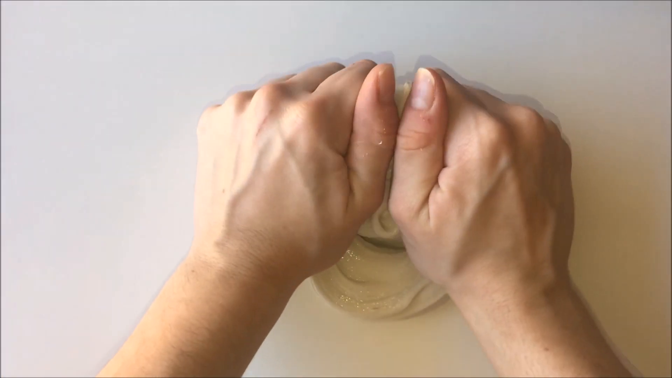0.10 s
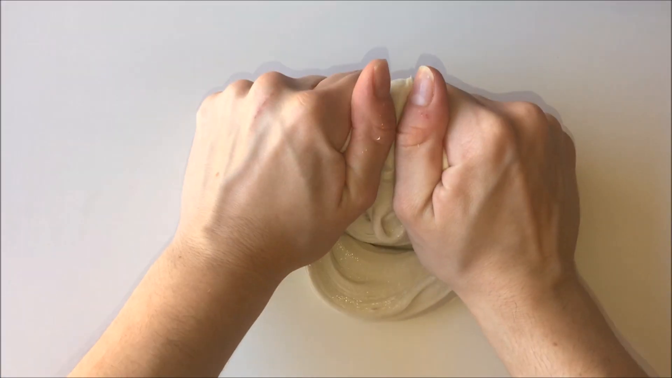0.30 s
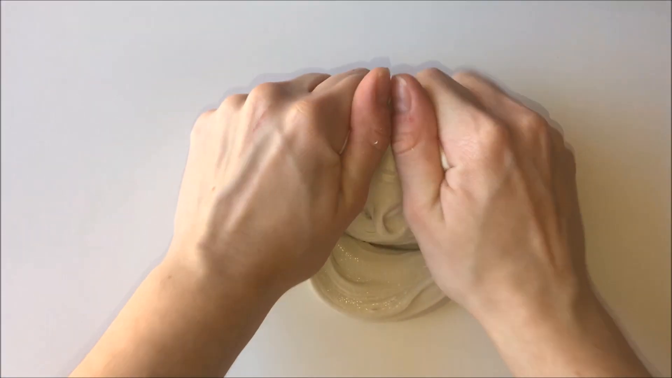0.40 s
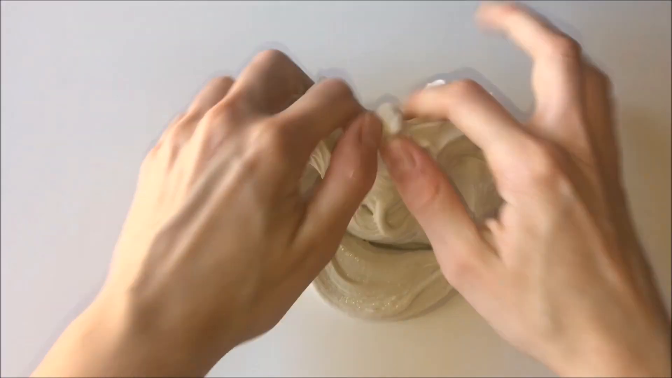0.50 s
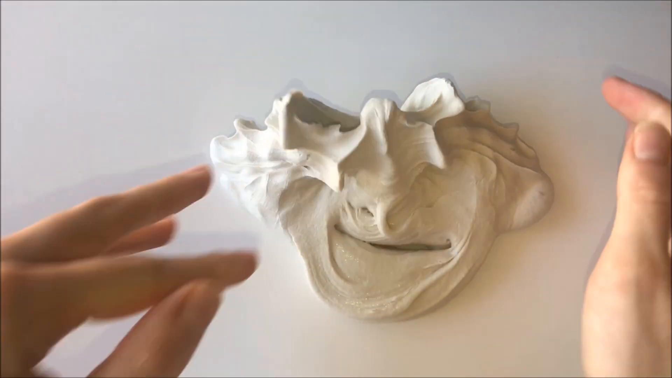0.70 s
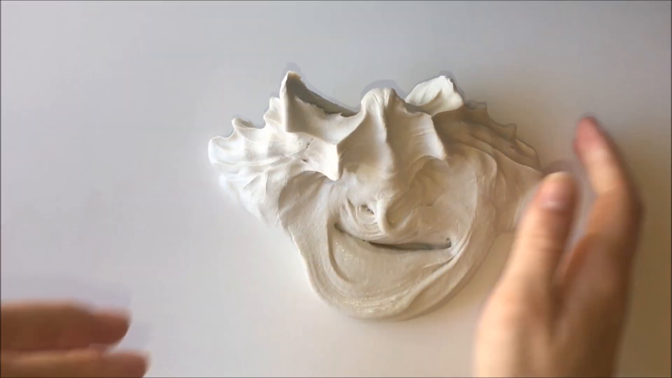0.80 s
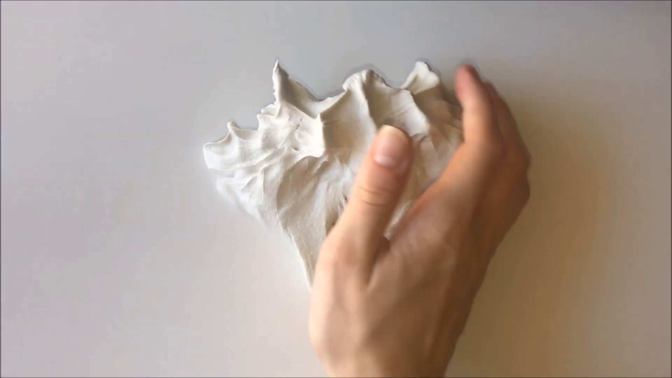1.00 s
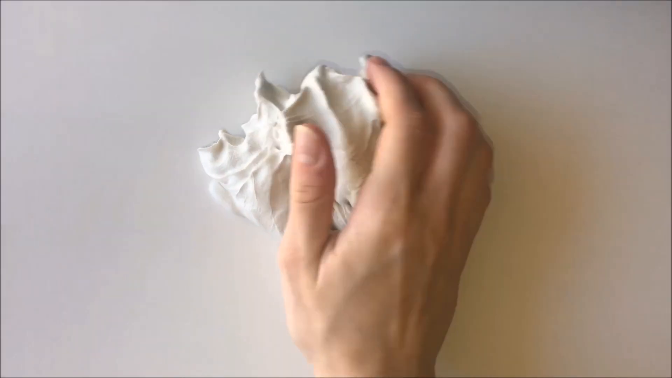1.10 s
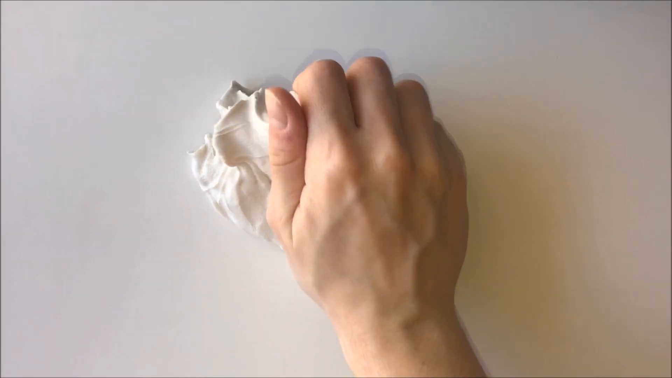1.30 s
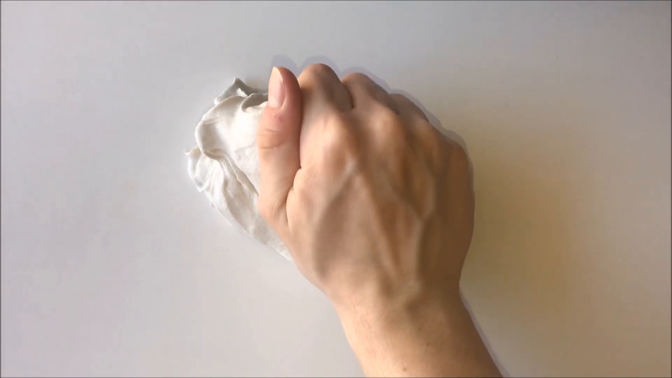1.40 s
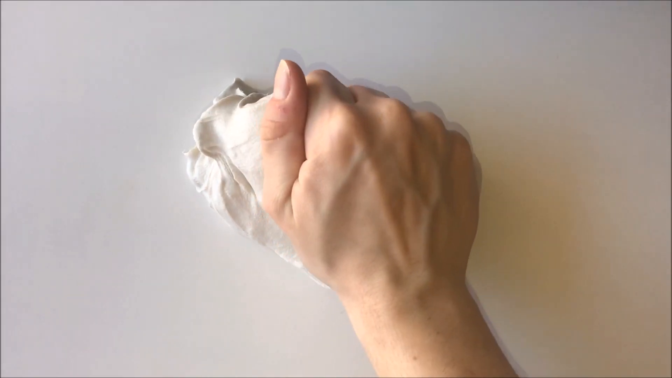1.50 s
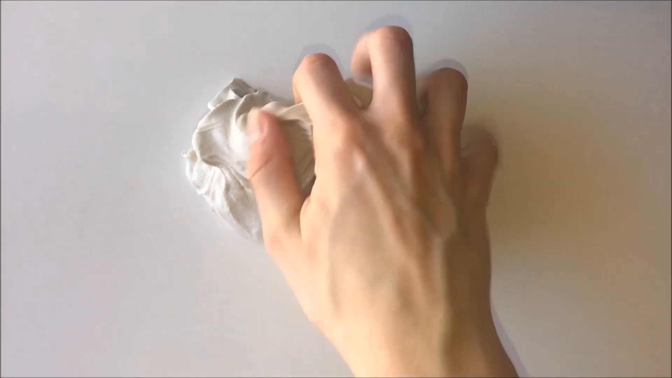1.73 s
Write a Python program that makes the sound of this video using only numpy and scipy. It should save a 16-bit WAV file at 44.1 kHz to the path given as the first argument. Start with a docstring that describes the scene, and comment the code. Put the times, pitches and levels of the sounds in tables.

```python
"""Close microphone over a table in a small room: hands let go of a lump of sticky slime, and films tear
and air pockets burst in a flurry of sharp pops, struck resonances that echo off the table and ring in the room.
Squelches (noise in narrow resonances) and peeling skin (a dense crackle of tiny ringing snaps) run among them.
After a near-silent gap one hand squeezes the lump: more squelches, sparser pops, fresh crackle.
Underneath all along lies the quiet room: coloured noise and low hums."""
import sys
import numpy as np
from scipy import signal
from scipy.fft import rfft, irfft
from scipy.io import wavfile

SR = 44100
rng = np.random.default_rng(int(sys.argv[2]) if len(sys.argv) > 2 else 0)


def int16_out(signal):
    """Quantize to a 16-bit WAV file."""
    q = np.round(np.clip(np.atleast_2d(signal).T, -1, 1) * 32767)
    wavfile.write(sys.argv[1], SR, q.astype(np.int16))


N = 79380  # samples, 1.8 s

# Colour of the peeling crackle before its tilt moves: pitch_hz, density_db (relative, per Hz)
CRACKLE_COLOUR = [(220, -10.5), (400, 1), (800, -15), (1500, -0.5), (2500, -4), (4000, -2), (7000, -6.5),
                  (15500, -10.5)]


def amp(db):
    """Turn decibels into gain."""
    return 10 ** (np.asarray(db) / 20)


def rms_one(x):
    """Scale to unit rms."""
    return x / np.sqrt(np.mean(x ** 2) + 1e-20)


def peak_one(x):
    """Scale to unit peak."""
    return x / np.abs(x).max()


def at_hz(points, hz):
    """Read a spectrum in dB on a log-frequency axis."""
    table_hz, table_db = np.array(points).T
    return np.interp(np.log(hz), np.log(table_hz), table_db)


def ring(clicks, hz, t60):
    """A two-pole resonator: each click starts a sine at hz that falls 60 dB in t60 seconds."""
    radius = amp(-60 / (t60 * SR))
    angle = 2 * np.pi * hz / SR
    feedback = [1, -2 * radius * np.cos(angle), radius * radius]
    return signal.lfilter([0, np.sin(angle)], feedback, clicks + 1e-18)


def butter(x, hz, kind):
    """Second-order Butterworth filter."""
    return signal.sosfilt(signal.butter(2, hz, kind, fs=SR, output="sos"), x)


def drift(corner_hz):
    """Slow random wander of unit rms: noise through two equal low-pass poles."""
    settle = 4000  # samples dropped while the filter settles
    pole = np.exp(-2 * np.pi * corner_hz / SR)
    noise = rng.standard_normal(N + settle)
    return rms_one(signal.lfilter([1], [1, -2 * pole, pole * pole], noise)[settle:])


def pops():
    """A snap and a short tearing burst excite the pocket's ring, a duller body mostly below its pitch
    and a broad fizz from somewhat below its pitch upwards."""
    # Pops: start_s, peak_db, pocket_hz, ring_cycles (in a 60 dB fall), body_db and fizz_db (against
    # the pocket's ring), tear_ms (time constant of the tearing's decay)
    bursts = [(0.0102, -38, 4870, 2.7, -24, -10, 2.6), (0.0141, -24.5, 2780, 6.3, -17.5, -22, 0.53),
              (0.0739, -35.5, 4540, 1.9, -13, -14, 1.6), (0.1144, -29, 2940, 5.2, -13, -37, 1.04),
              (0.116, -37, 7000, 2, 2.5, -25, 0.84), (0.136, -34.5, 3300, 15, -32, -4, 1.4),
              (0.14, -22, 6200, 1.6, -33, -10, 0.81), (0.142, -26.5, 8870, 2, -10, -26, 0.24),
              (0.1996, -21, 5740.0, 1, -17, -19, 3.4), (0.2052, -26.5, 3170, 12, -1, 7.5, 2.7),
              (0.2136, -11, 7100, 1.2, 5, 13, 1.3), (0.223, -34, 11000.0, 2.1, -52, -19, 2.2),
              (0.2346, -29.5, 8610.0, 3.2, 0, -13, 0.44), (0.2427, -23, 8000.0, 2.3, -14, 0, 0.95),
              (0.2546, -15.5, 6200.0, 1.3, -4.5, -25, 1.7), (0.2649, -1, 9500, 8.7, -31, -10.5, 0.34),
              (0.2698, -20, 3420, 15, -42, 1.5, 0.52), (0.287, 1.5, 8200, 3.7, -10.5, -14.5, 0.043),
              (0.296, -2, 4140, 2.6, -38, 0, 1.67), (0.2978, -8, 6060, 5.0, -10.5, -4, 2.0),
              (0.328, -30.5, 6220, 9.7, -27, -4, 13), (0.3554, -25, 1544, 12, -2, -12.5, 1.2),
              (0.509, -32, 3000, 5.2, 8.5, 8, 2.1), (0.544, -38, 3020, 8.3, -2.5, 1, 1.4),
              (0.5606, -28.5, 3300, 17, 0, -11, 3.2), (0.576, -30, 6760, 4.5, 1, -10, 4.5),
              (0.696, -40.5, 4250, 7.1, -32, -10, 6.6), (1.056, -10.5, 2690, 9.2, 2, -30, 0.48),
              (1.0578, -15, 1250, 5, -23.5, -36.5, 0.43), (1.0574, -29, 290, 4.6, -24, -25, 0.35),
              (1.1318, -26.5, 1300, 2.7, -4, -20, 5.3), (1.2934, -32.5, 2520, 2.8, -37, -22, 0.2),
              (1.3636, -24, 7600, 15, -10, -10.5, 0.37), (1.4158, -32.5, 3000, 2.9, -21, -21, 0.56),
              (1.458, -13.5, 4800, 3, -38, 19, 1.44), (1.4747, -22, 11100, 11, -6, -4, 1.2),
              (1.5124, -29, 4500, 2.2, -34, -30, 0.88), (1.5475, -0.5, 4460, 4.8, -34, 1.5, 0.25),
              (1.5475, -4.5, 5670, 7.3, -28, -25, 0.19), (1.548, -35.5, 550, 27, -17, -34.5, 0.27),
              (1.5972, -23.5, 10500, 5.5, -19, -15, 0.38), (1.6244, -36, 11000, 2.8, -15, -5, 0.3),
              (1.6626, -41, 3430, 3.7, 2.5, 12.5, 2), (1.788, -36, 785, 5.1, -2.5, 4, 5.5)]
    tearing_db = -6.5  # under the snap
    body_low_hz, fizz_from = 267.3, 0.58  # fizz edge as a share of the pocket's pitch
    length = 2048  # samples kept of each pop
    out, t = np.zeros(N + length), np.arange(length) / SR
    noises = rng.standard_normal((len(bursts), length))
    for (start_s, peak_db, hz, cycles, body_db, fizz_db, tear_ms), noise in zip(bursts, noises):
        spiky = noise * np.abs(noise) / 2
        push = amp(tearing_db) * spiky * np.exp(-t * 1000 / max(tear_ms, .05))
        push[0] = 1  # the snap
        pocket = ring(np.diff(push, prepend=0), hz, cycles / hz)
        body = butter(push, [body_low_hz, max(hz, 2 * body_low_hz)], "band")
        body = butter(body, body_low_hz, "high")
        fizz = butter(push, min(fizz_from * hz, .3 * SR), "high")
        pop = peak_one(pocket) + amp(body_db) * peak_one(body) + amp(fizz_db) * peak_one(fizz)
        i = int(start_s * SR)
        out[i:i + length] += amp(peak_db) * peak_one(pop)
    return out[:N]


def squelches():
    """Air squeezed through a wet gap: noise in a narrow resonance that swells and dies away."""
    # Squelches: peak_s, rise_ms, fall_ms (time constants), pitch_hz, width_hz (of each of two
    # resonators in a row), level_db (rms before the swell)
    squeezes = [(0.357, 1.2, 20.2, 1618, 156.8, -38), (0.361, 1.8, 12.6, 1335, 80, -40.5),
                (0.358, 3.5, 20, 337.6, 60, -58.5), (0.609, 30, 13, 1124, 440, -44.5),
                (1.045, 35, 5, 1900, 249.3, -60.5), (1.044, 26, 4.7, 2700, 500, -59.5),
                (1.134, 2.1, 23.5, 1430, 464, -43.5), (1.145, 8.9, 31, 359, 90, -54),
                (1.78, 8, 31, 1960, 119, -45)]
    t, out = np.arange(N) / SR, 0
    noises = rng.standard_normal((len(squeezes), N))
    for (peak_s, rise_ms, fall_ms, hz, width_hz, db), noise in zip(squeezes, noises):
        t60 = np.log(1000) / (np.pi * width_hz)
        ms = (t - peak_s) * 1000
        swell = np.exp(np.minimum(ms / rise_ms, -ms / fall_ms))
        tone = rms_one(ring(ring(noise, hz, t60), hz, t60))
        out = out + amp(db) * swell * tone
    return out


def peeling():
    """Skin peels and slime creeps: a dense fine crackle with larger wet bubbles, in clumps, following the hands."""
    # Course of the peeling: time_s, level_db, tilt_db (treble, per two octaves), low_db (gain of the lows)
    course = [(0, -52, -1.5, -10.5), (0.03, -41.5, -6.5, -1), (0.099, -61, 3.5, 7.5), (.2, -74.5, 11, 13.5),
              (0.301, -41, -4, -3), (0.329, -40.5, 3, -9.5), (.36, -50.5, 14.5, -12.5), (.4, -58.5, 8, -1),
              (.48, -62, 0.5, -1.5), (.51, -44, 1.5, 7.5), (0.561, -36, 0.5, -8.5), (0.603, -44, 5, -2.5),
              (0.654, -38.5, 0, -3.5), (0.671, -54.5, 1, 3.5), (0.702, -48, -1.5, -1.5),
              (0.731, -62.5, 7.5, 3.5), (.755, -55.5, 5.5, -4), (0.778, -71, -9.5, 0.5),
              (0.962, -72.5, -6.5, -2.5), (1.0, -61, -12, -9), (1.05, -52, -4.5, -14),
              (1.08, -44.5, -7.5, -1.5), (1.12, -61.5, -1.5, 7), (1.133, -36, -9, -2),
              (1.161, -42.5, -4.5, 1.5), (1.261, -60, 2, -2), (1.329, -60, -5.5, 4), (1.498, -64, 5, 14),
              (1.733, -63.5, 2.5, 9.5), (1.769, -46.5, 0.5, 6), (1.8, -43, -1.5, 5.5)]
    clump_db, clump_hz = 2.5, 30  # depth and corner of the clumping
    bubble_db = -11  # under the fine crackle
    time_s, *columns = np.transpose(course)
    level_db, tilt_db, low_db = [np.interp(np.arange(N) / SR, time_s, c) for c in columns]
    fine = grains(16000, 8.5, CRACKLE_COLOUR[-1][0], tilt_db, low_db)
    bubbles = amp(bubble_db) * grains(450, 4.1, 8000, tilt_db, low_db)  # fewer, lower in pitch
    return amp(level_db + clump_db * drift(clump_hz)) * (fine + bubbles)


def grains(per_s, cycles, top_hz, tilt_db, low_db):
    """Random snaps dealt to resonators spread in pitch, each band patchy in its own way; rms 1."""
    spread_db, patch_db, patch_hz = -1, 2, 20
    tilt_from_hz, low_below_hz = 1400, 700
    sizes = amp(spread_db * np.minimum(rng.exponential(1, N), 5)) * rng.choice([-1, 1], N)
    pitches = np.geomspace(220, top_hz, num=24)
    odds = np.sqrt(pitches) / np.sqrt(pitches).sum()  # high snaps come more often
    born = rng.random(N) < per_s / SR
    dealt = rng.choice(len(pitches), N, p=odds)
    out = 0
    for k, hz in enumerate(pitches):
        snaps = sizes * born * (dealt == k)
        band = rms_one(ring(ring(snaps, hz, 2 / hz), hz, cycles / hz))
        shape_db = tilt_db * max(np.log2(hz / tilt_from_hz), 0) / 2 + low_db * (hz < low_below_hz)
        band_db = at_hz(CRACKLE_COLOUR, hz) + shape_db + patch_db * drift(patch_hz)
        out = out + band * np.sqrt(hz) * amp(band_db)  # bands widen with pitch
    return rms_one(out)


def room(x):
    """Direct sound, a few dulled early echoes, a short near scatter and a longer, duller tail."""
    # Echoes off the table and nearby things: delay_s, level_db (against the direct sound, before dulling)
    echoes = [(.00045, -16.5), (.0021, -22), (.0052, -25.5), (.0076, -26), (0.012, -26)]
    near_db, near_t60_s = -29, 0.04
    tail_db, tail_t60_s, tail_cut_hz = -44, 0.3, 8200
    scatter_rise_s, echo_cut_hz = 0.002, 5200
    t = np.arange(SR // 2) / SR
    near, far = rng.standard_normal((2, len(t)))
    far = butter(butter(far, tail_cut_hz, "low"), 2 * tail_cut_hz, "low")
    scatter = amp(near_db - 60 * t / near_t60_s) * near
    scatter += amp(tail_db - 60 * t / tail_t60_s) * far
    early = np.zeros(len(t))
    for delay_s, db in echoes:
        early[int(delay_s * SR)] = amp(db)
    response = scatter * np.minimum(t / scatter_rise_s, 1) + butter(early, echo_cut_hz, "low")
    response[0] = 1  # the direct sound
    return signal.fftconvolve(x, response)[:N]


def room_tone():
    """The quiet room: spectrally coloured noise, hums wavering as narrow noise bands, and a steadier hum."""
    # Colour of the room noise: freq_hz, density_db (relative, per Hz)
    floor_colour = [(20, -8), (60, -10), (110, -6.5), (250, -13.5), (500, -23.5), (1000, -22.5),
                    (2000, -29.5), (4000, -33), (8000, -37), (15800, -34.5)]
    # Wavering hums: centre_hz, width_hz (at half amplitude), level_db (rms)
    wavering = [(32, 3.9, -69), (76, 44, -62.5)]
    floor_db = -65.5  # rms
    line_hz, line_db, line_waver_db, waver_hz = 196.8, -66, 4.5, 8.6  # the steadier hum
    hz = np.maximum(np.arange(N // 2 + 1) * SR / N, 10)
    white = rfft(rng.standard_normal((1 + len(wavering), N)))
    out = amp(floor_db) * rms_one(irfft(white[0] * amp(at_hz(floor_colour, hz)), N))
    for spectrum, (centre_hz, width_hz, db) in zip(white[1:], wavering):
        resonance = 1 / (1 + (2 * (hz - centre_hz) / width_hz) ** 2)
        out += amp(db) * rms_one(irfft(spectrum * resonance, N))
    line = np.sin(2 * np.pi * line_hz * np.arange(N) / SR)
    return out + amp(line_db + line_waver_db * drift(waver_hz)) * line


def scene():
    """Pops sounding in the room, with squelches, peeling and room tone beside them."""
    return (room(pops()) + squelches() + peeling() + room_tone())[None]


def record(dry):
    """The microphone dulls the treble, the loudest peaks clip, and a steep filter cuts the top."""
    mic_roll_hz, cutoff_hz = 14500, 17100
    clipped = np.clip(butter(dry, mic_roll_hz, "low"), -1.05, 1.05)
    top_cut = signal.cheby2(18, 85, cutoff_hz, fs=SR, output="sos")
    return signal.sosfilt(top_cut, clipped)


dry = scene()
out = record(dry)
int16_out(out)
```